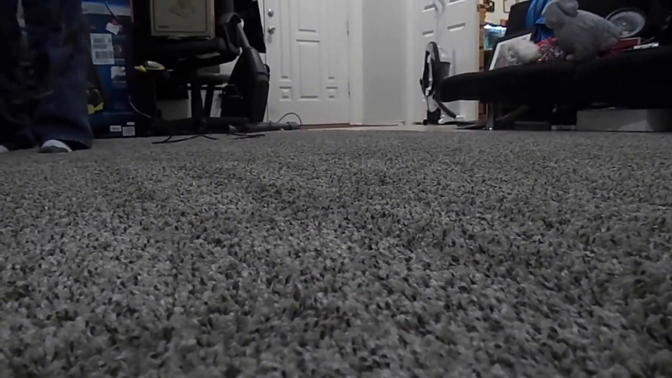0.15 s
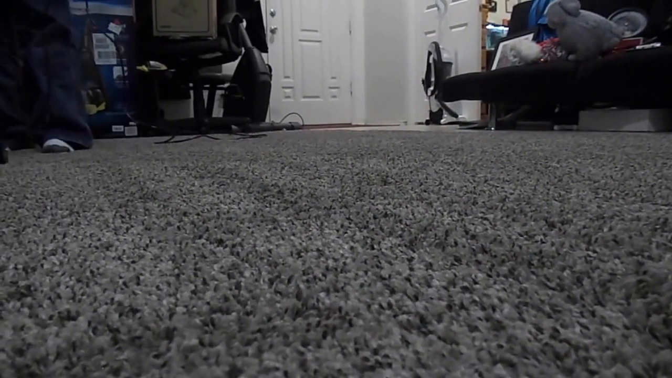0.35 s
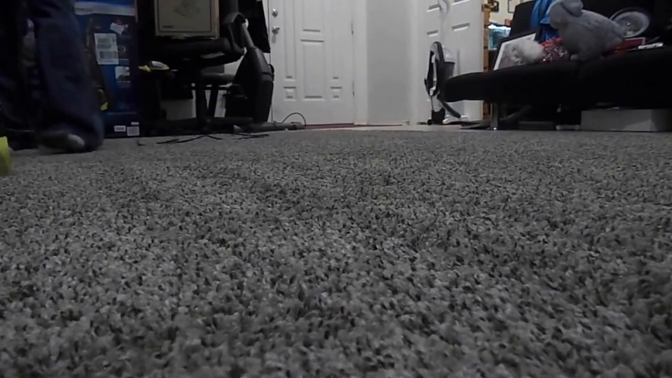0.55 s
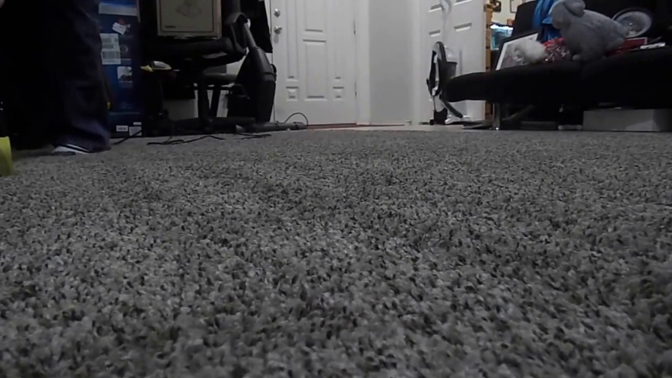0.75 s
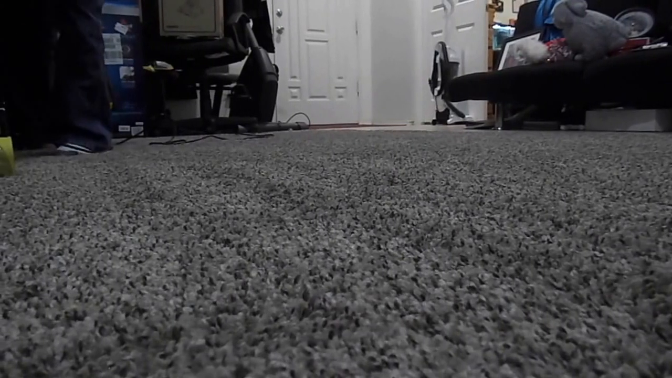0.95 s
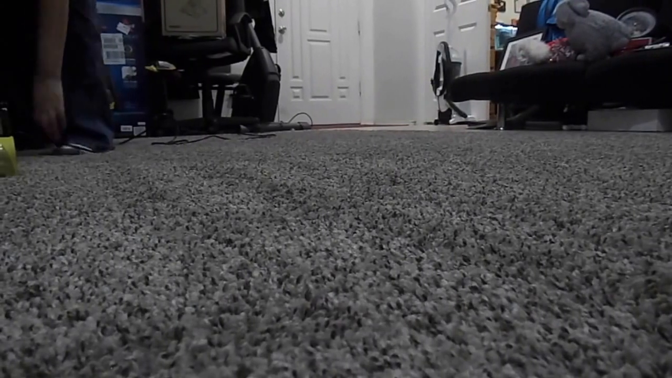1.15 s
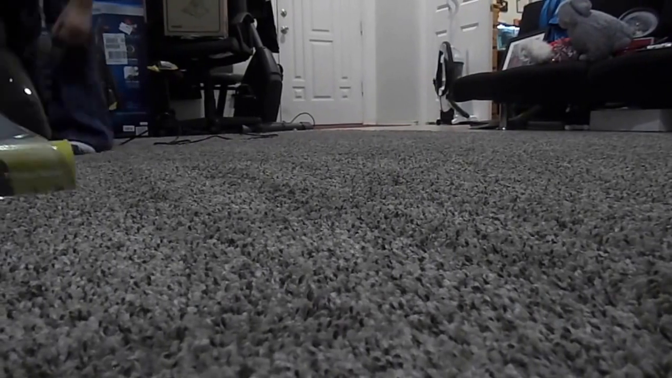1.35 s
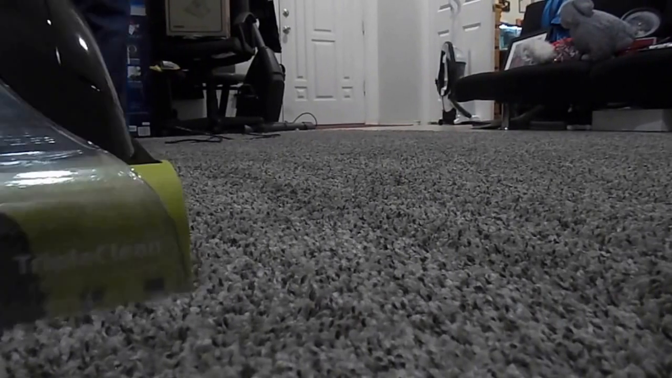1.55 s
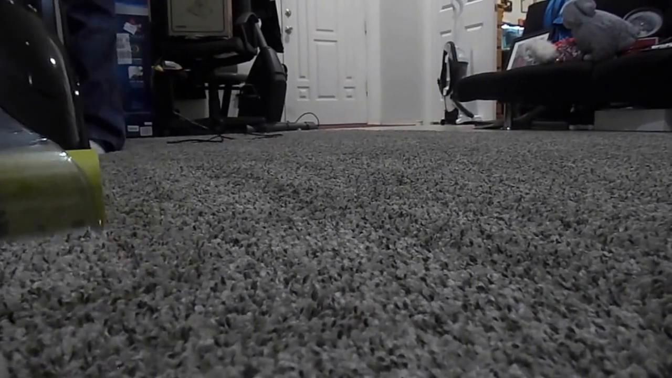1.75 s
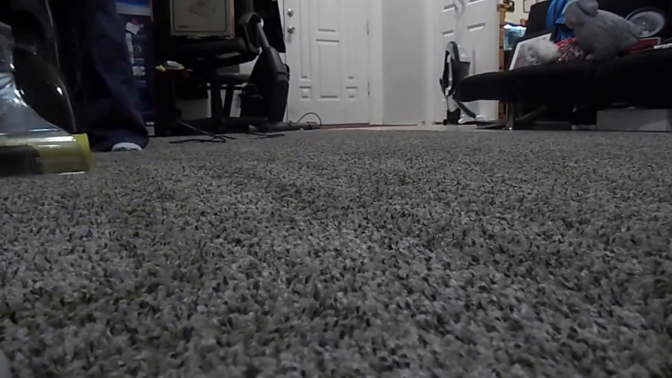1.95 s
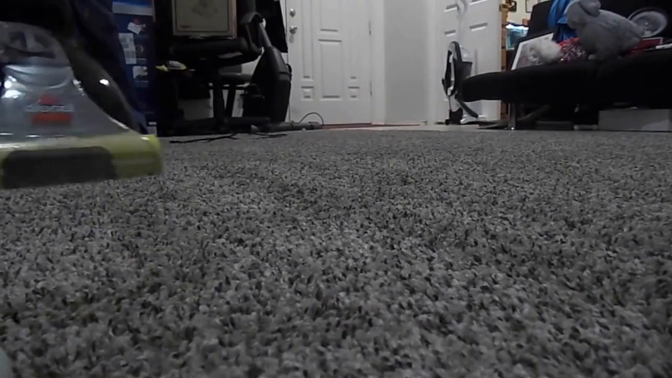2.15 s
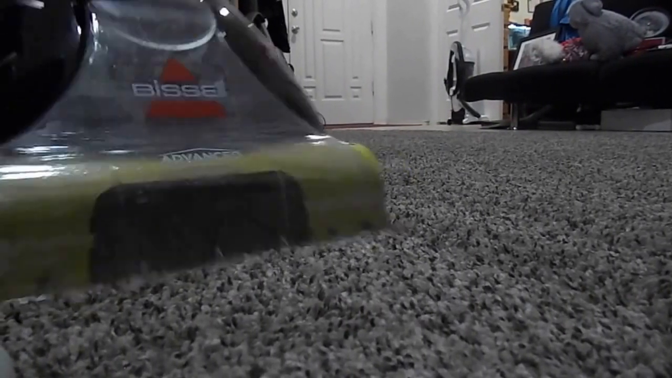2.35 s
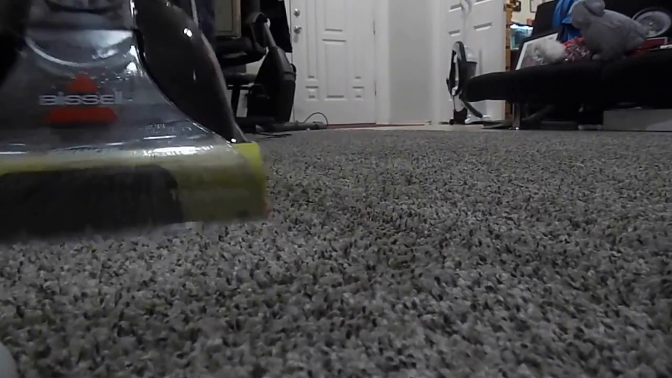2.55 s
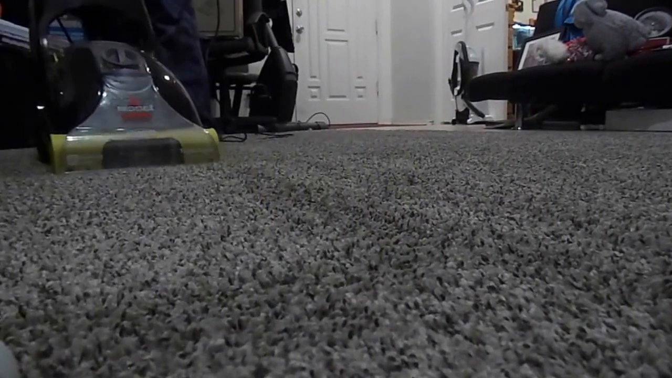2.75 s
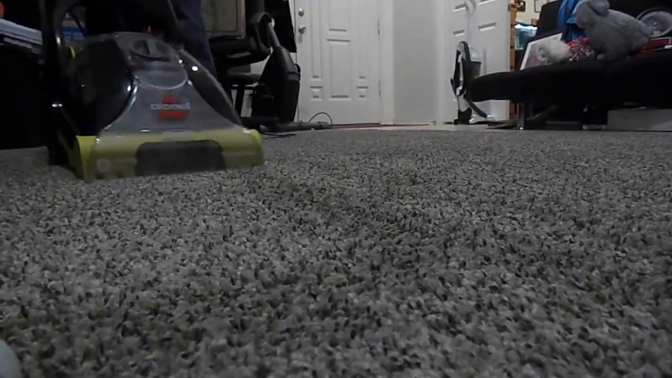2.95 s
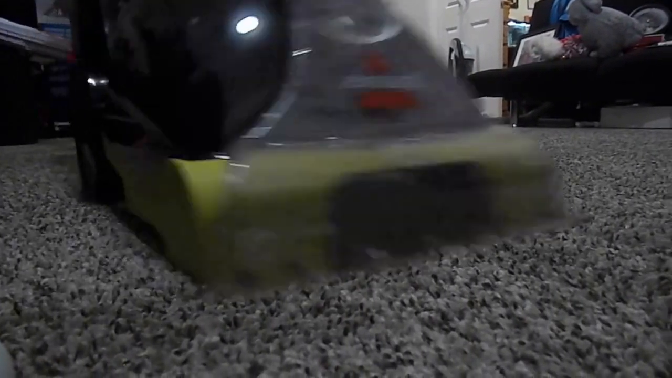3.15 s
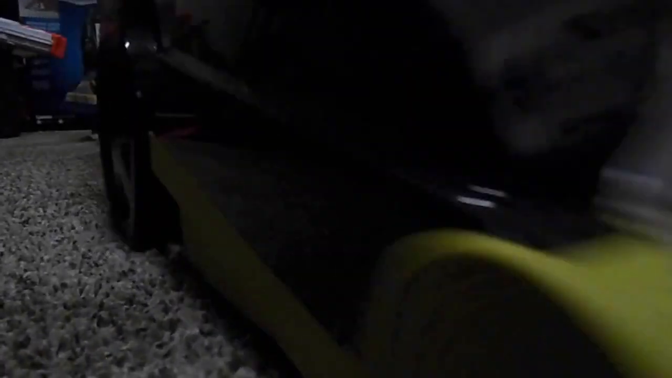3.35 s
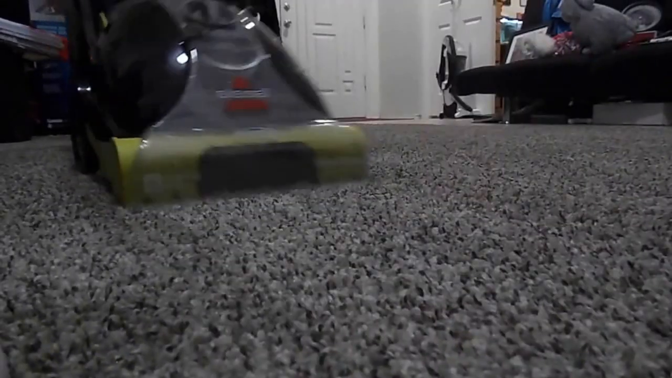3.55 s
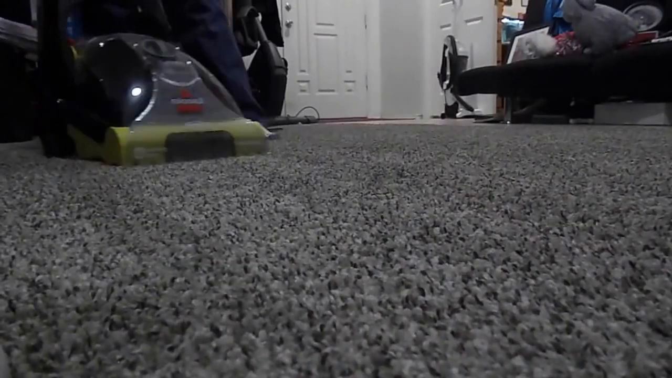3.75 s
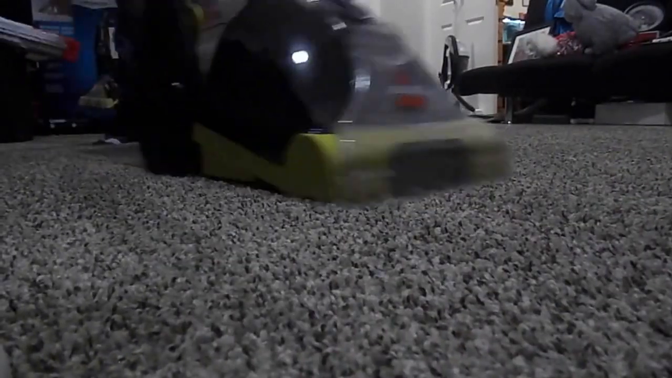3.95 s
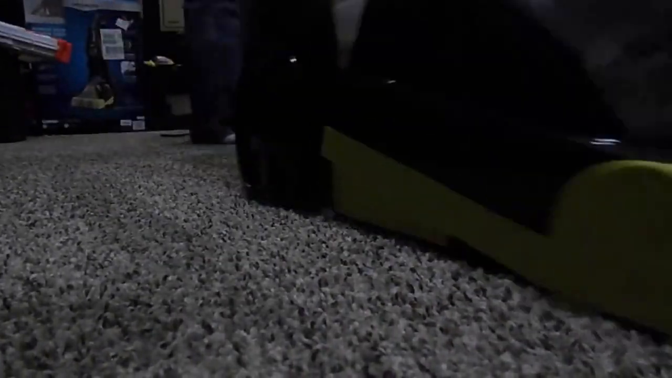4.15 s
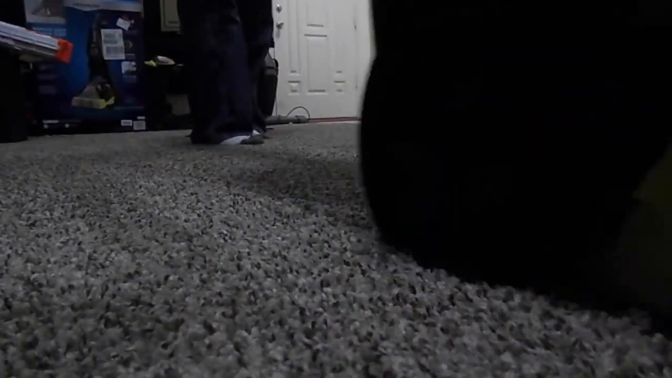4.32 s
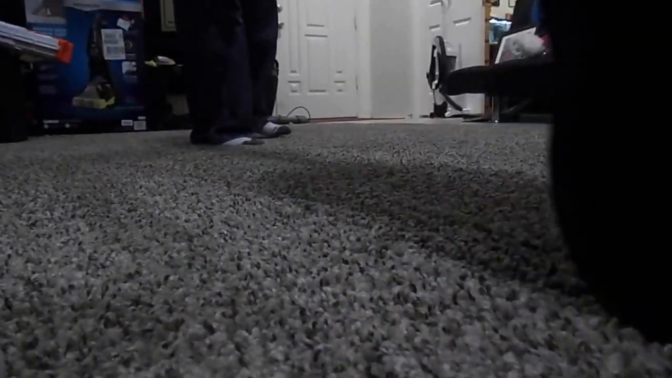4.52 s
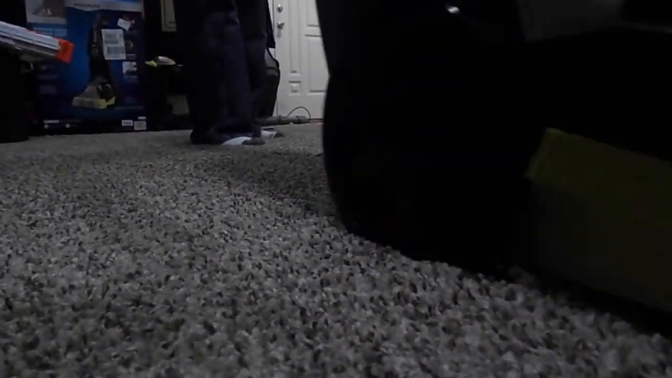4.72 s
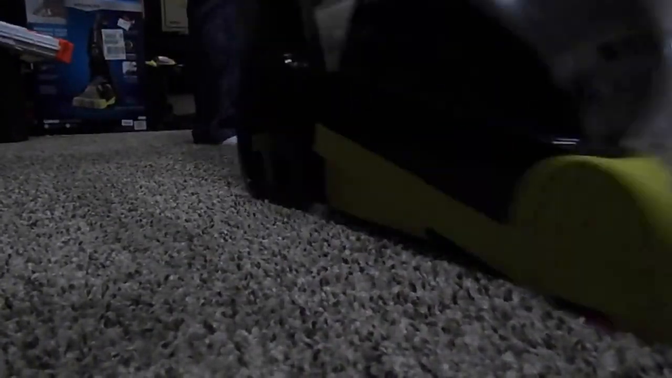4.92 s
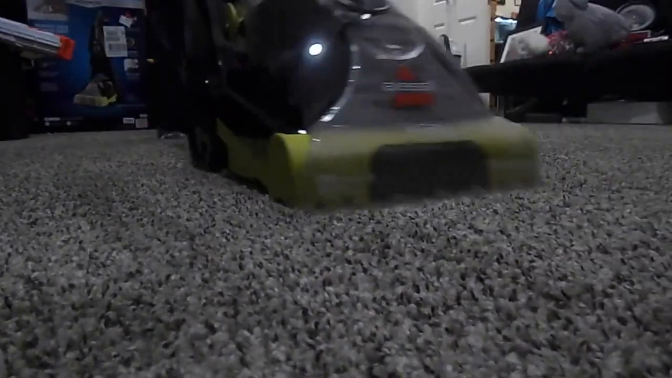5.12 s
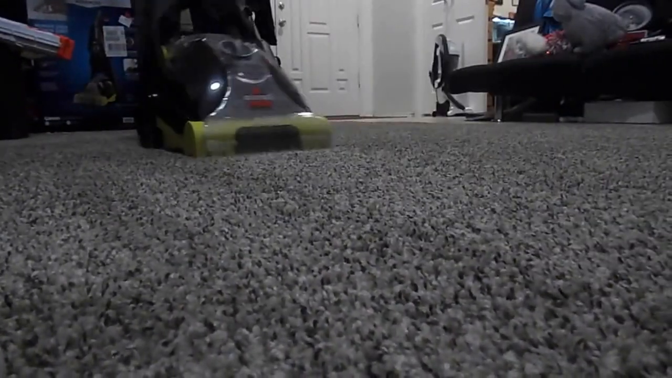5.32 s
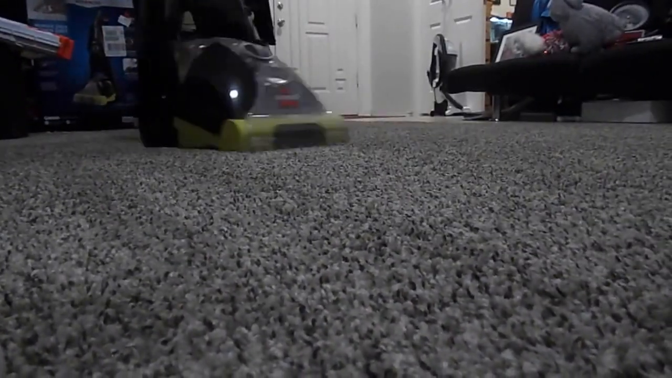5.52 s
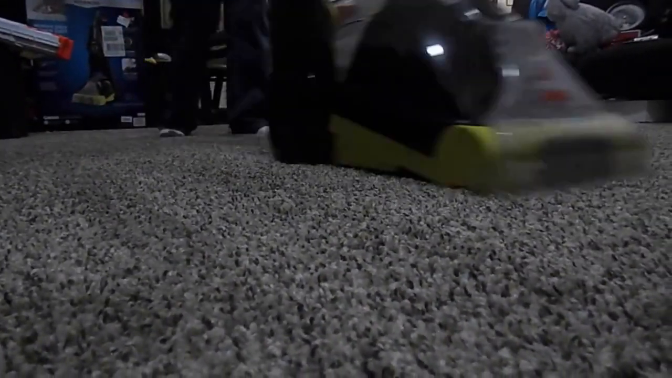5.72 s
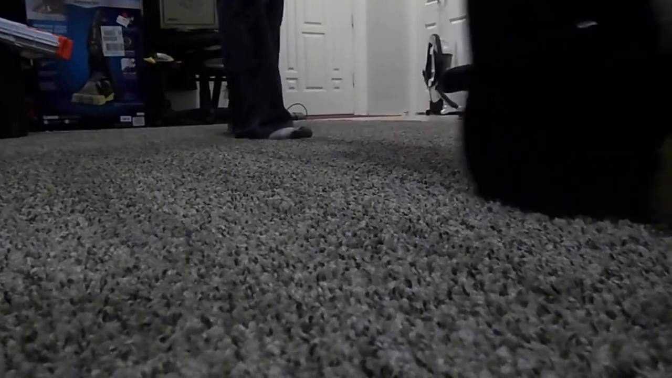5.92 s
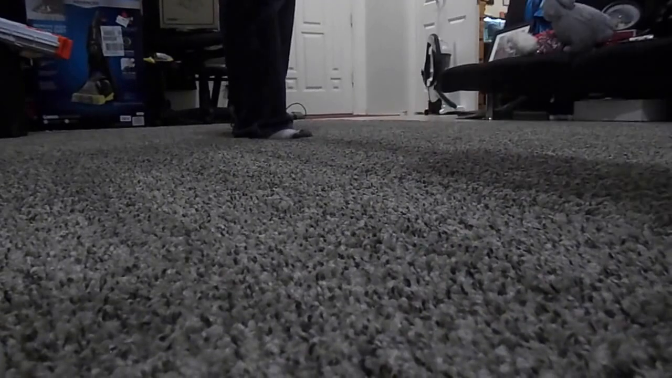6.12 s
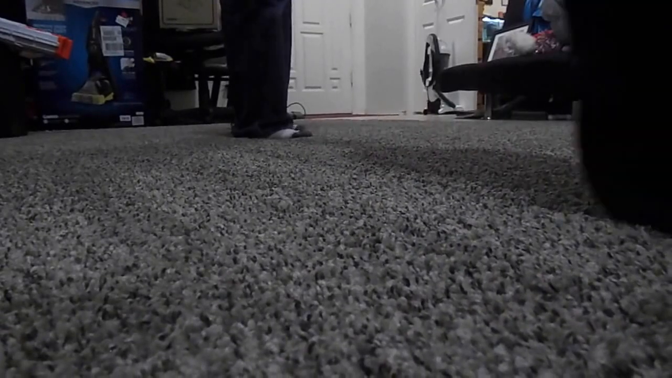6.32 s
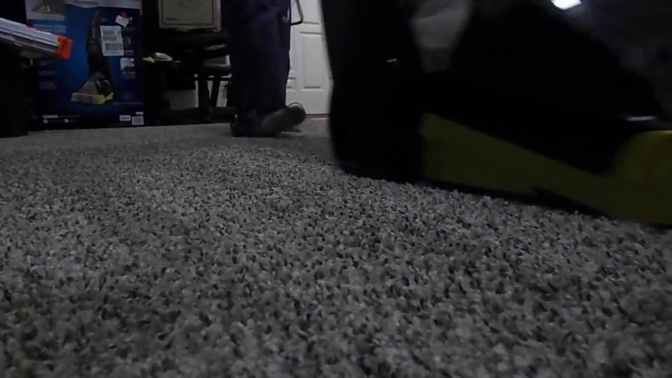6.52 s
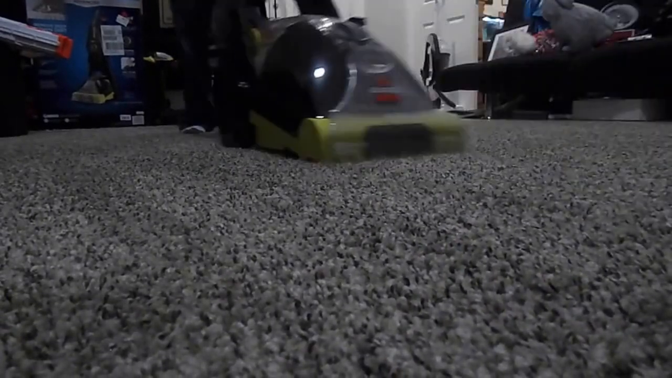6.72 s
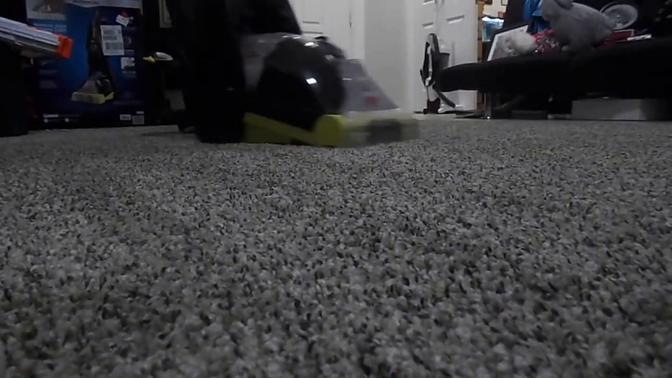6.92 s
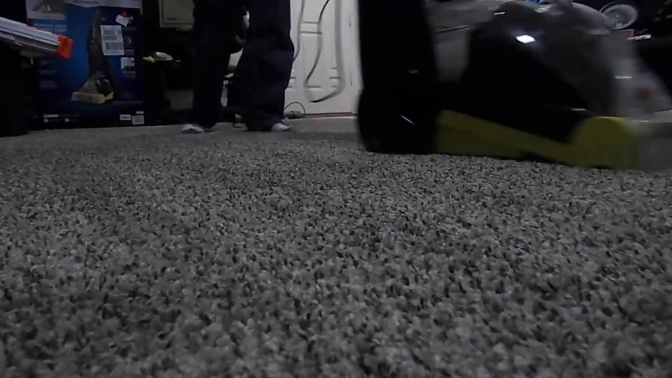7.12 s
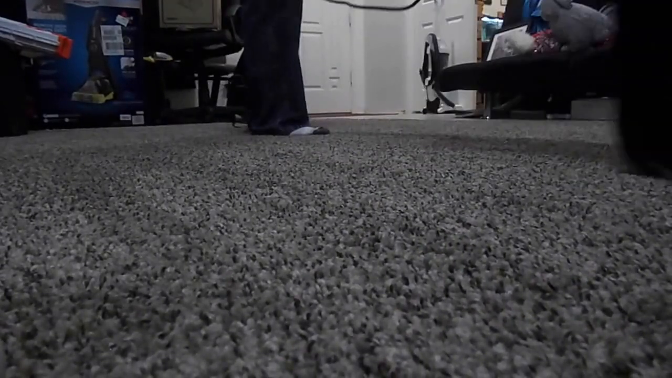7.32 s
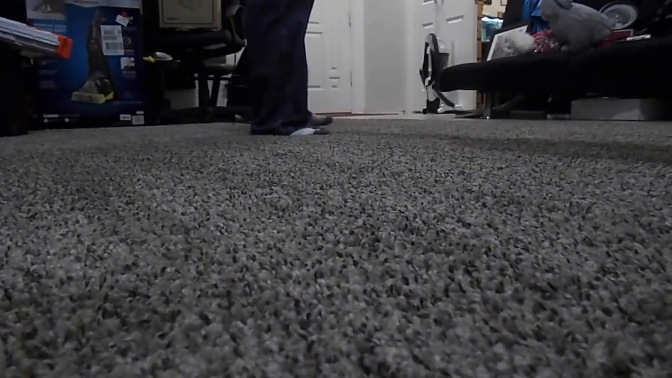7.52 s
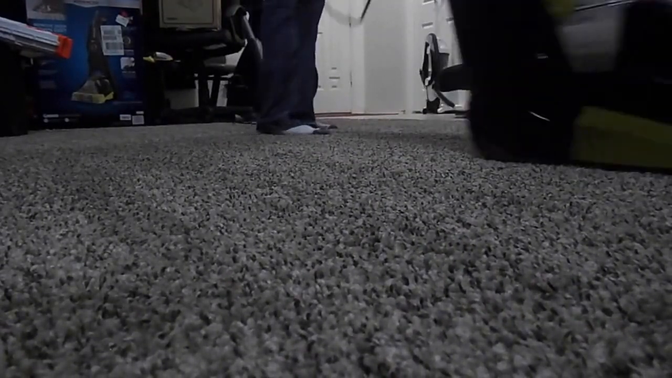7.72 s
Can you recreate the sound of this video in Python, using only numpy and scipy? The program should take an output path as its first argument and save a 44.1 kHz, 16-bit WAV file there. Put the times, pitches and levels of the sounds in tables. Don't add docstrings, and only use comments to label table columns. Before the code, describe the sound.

An electric carpet cleaner runs without pause in a small carpeted room, heard from a microphone on the floor. Airy midrange roar, nozzle hiss and a steady high whine idle for over a second with a fading pump hum, then surge and recede in repeated passes. The loudest rush comes before the middle; later side passes sound broader, with sweeping hollow colour. Thin bass, essentially mono.

```python
import sys
import numpy as np
from scipy import signal
from scipy.fft import rfft, irfft
from scipy.io import wavfile
from scipy.ndimage import uniform_filter1d, map_coordinates

SR = 44100
rng = np.random.default_rng(int(sys.argv[2]) if len(sys.argv) > 2 else 0)


def inscribe(sig):
    pcm = np.round(np.clip(np.atleast_2d(sig).T, -1, 1) * 32767)
    wavfile.write(sys.argv[1], SR, pcm.astype(np.int16))


def rack_gain(trim_db):
    fader = np.asarray(trim_db, float)
    return 10 ** (fader / 20)


N = 342657
TIME = np.arange(N) / SR
FRAME = 2048
TOP_HZ = 15765


def unit(x):
    return x / np.sqrt(np.mean(x ** 2) + 1e-20)


def curves(rows):
    s, *columns = np.transpose(rows)
    return [np.interp(TIME, s, column) for column in columns]


def tents(rows):
    return sum(size * np.clip(1 - abs(TIME - s) / half, 0, 1) for s, half, size in rows)


def wobble(rate):
    knots = rng.standard_normal(int(N * rate / SR) + 4)
    return map_coordinates(knots, [np.arange(N) * rate / SR])


def tone(hz, db, waver_hz, flutter_db):
    phase = 2 * np.pi * np.cumsum(hz + waver_hz * wobble(25)) / SR
    return np.sqrt(2) * rack_gain(db + flutter_db * wobble(20)) * np.sin(phase)


# (time [s], nearness [dB], facing [0 nose-on to 1 side-on])
PATH = [(0, 0.5, 0.065), (.45, -7.5, .02), (1.38, -5.5, 0.051), (1.68, 1, 0.11), (2.1, -8.5, .1),
        (2.53, 1, 0.22), (2.9, -10, 0.11), (3.1, -5, 0.3), (3.38, 7.5, 0.47), (3.758, -8.5, 0.27),
        (4.35, 6, 0.85), (4.85, 6, 0.7), (5.5, -9.5, 0.32), (5.95, 2, 0.88), (6.5, 3.5, .95),
        (6.9, -8.5, 0.32), (7.2, -2.5, 0.83), (7.77, 0.1, 1)]
# (time [s], half length [s], depth [0-1])
TURNS = [
    (4.53, 0.25, 1),
    (6.22, 0.26, 0.97),
    (7.52, 0.32, 0.6),
]


def level(law):
    base_db, per_near_db, side_on_db, turn_db = law
    near_db, facing = curves(PATH)
    return base_db + per_near_db * near_db + side_on_db * facing + turn_db * tents(TURNS)


# (time [s], half length [s], stretch [ratio])
COMB_DIPS = [
    (4.6, .55, -.105),
    (5.5, .3, -.08),
    (6.3, .7, -.115),
    (7.3, .9, -.12),
]


def spectrum(points, hz):
    corner_hz, db = np.transpose(points)
    return rack_gain(np.interp(np.log(hz + 1), np.log(corner_hz), db, left=-120))


def rush(colours, patchy_db, slide=0):
    hz, t, z = signal.stft(rng.standard_normal(N + FRAME), SR, nperseg=FRAME)
    stretch = 1.1 + np.interp(t * SR, np.arange(N), tents(COMB_DIPS))
    nose = spectrum(colours[0], hz[:, None])
    flank = spectrum(colours[1], hz[:, None] / stretch ** slide)
    path_s, _, facing = np.transpose(PATH)
    turn = np.clip(np.interp(t, path_s, facing), 0, 1)
    heard = hz < TOP_HZ
    nose_power = nose ** 2 / np.mean(nose[heard] ** 2)
    flank_power = flank ** 2 / np.mean(flank[heard] ** 2, axis=0)
    colour = np.sqrt((1 - turn) * nose_power + turn * flank_power)
    patches = uniform_filter1d(rng.standard_normal(z.shape), size=4, axis=0)
    patches = unit(uniform_filter1d(patches, size=10, axis=1))
    z = z * colour * heard[:, None] * rack_gain(patchy_db * patches)
    return unit(signal.istft(z, nperseg=FRAME)[1][:N])


# (frequency [Hz], density [dB per Hz])
DUCT = [
    [(680, -44), (1150, -16), (1480, -1.5), (1690, -2), (1750, -2.5), (1840, -7), (1900, -5), (2250, -17), (2920, -48), (4950, -120)],
    [(680, -42), (1150, -18), (1290, -18), (1410, -3.5), (1580, -0.5), (1740, 1), (1940, -7), (2250, -9), (2920, -30), (4950, -120)],
]
# (level at nearness 0 [dB], slope [dB per dB nearness], side-on gain [dB], turn gain [dB])
DUCT_LAW = (-30.5, 0.8056, -2.8, -3)
# (time [s], half length [s], level [dB])
DUCT_SPOTS = [
    (.25, .2, 2),
    (1.5, .12, -2),
    (2.3, 0.13, -3),
    (2.75, 0.33, -3.5),
    (3.78, 0.34, -5),
    (5.45, 0.3, -5.5),
    (7.6, 2, -2.5),
]


def duct(judder):
    db = level(DUCT_LAW) + tents(DUCT_SPOTS) + 0.15 * judder
    return rack_gain(db) * rush(DUCT, patchy_db=1.7)


# (frequency [Hz], density [dB per Hz])
EXHAUST = [
    [(1180, -36), (2000, -2.5), (2470, -3), (2830, -1.5), (3360, -4.5), (3660, -4), (5300, -12.5), (6890, -21), (11700, -120)],
    [(1180, -42), (2000, 1), (2410, -2), (2850, 0.5), (3810, 0), (5300, -16.5), (6890, -42), (11700, -120)],
]
# (level at nearness 0 [dB], slope [dB per dB nearness], side-on gain [dB], turn gain [dB])
EXHAUST_LAW = (-33, 1.15, -0.1, -0.7)
# (time [s], half length [s], level [dB])
EXHAUST_SPOTS = [
    (.8, 0.55, 0.5),
    (3.58, 0.14, -2),
    (5.2, 0.24, -0.5),
]


def exhaust(judder):
    db = level(EXHAUST_LAW) + tents(EXHAUST_SPOTS) + 0.3 * judder + 0.3 * wobble(14)
    return rack_gain(db) * rush(EXHAUST, patchy_db=1.55, slide=0.6)


# (time [s], pitch [Hz])
WHINE_HZ = [(0, 1795), (.35, 1797), (1.4, 1792), (2.15, 1796), (2.6, 1790), (3, 1795), (3.35, 1788),
            (4, 1791), (4.45, 1786), (4.65, 1794), (5.25, 1793), (5.8, 1787), (6.15, 1784), (6.35, 1792),
            (7.3, 1784), (7.77, 1793)]
# (level at nearness 0 [dB], slope [dB per dB nearness], side-on gain [dB], turn gain [dB])
WHINE_LAW = (-33, 0.84, -1.7, -10)
# (time [s], half length [s], level [dB])
WHINE_SPOTS = [(.6, 0.46, 1.5), (1.3, 0.19, 3.5), (1.58, 0.23, -5), (2.0, 0.12, 4), (2.32, 0.21, -8.5),
               (2.56, 0.072, 0.5), (3.0, 0.16, -6.5), (3.18, 0.072, 3.5), (3.56, 0.12, 2), (3.83, .13, -8),
               (5.1, 0.37, 5), (5.58, 0.11, -6), (5.9, .2, 3.5), (6.7, 0.38, 5), (7.0, 0.12, -4),
               (7.4, 0.18, -11), (7.68, .1, -14)]


def gear_whine():
    return tone(*curves(WHINE_HZ), level(WHINE_LAW) + tents(WHINE_SPOTS), waver_hz=1.2, flutter_db=1.1)


# (frequency [Hz], density [dB per Hz])
NOZZLE = [
    [(2820, -35), (4800, -11), (5630, -4.5), (6180, -2.5), (6530, -1.5), (6830, -3), (7690, -2.5), (9050, -6.5), (10400, -4.5), (11700, -10), (13800, -7), (15700, -15)],
    [(2820, -16), (4800, -3.5), (5410, -12), (5740, -1), (6210, -0.5), (7240, -0.5), (8280, -12), (9010, -8), (9800, -2.5), (11000, -7), (13500, -3.5), (15100, -11.5), (15700, -2)],
]
# (level at nearness 0 [dB], slope [dB per dB nearness], side-on gain [dB], turn gain [dB])
NOZZLE_LAW = (-37.5, 0.8, -1.04, -0.2)
# (time [s], half length [s], level [dB])
NOZZLE_SPOTS = [
    (6.3, 0.55, -0.5),
    (7.7, .6, -1),
]


def nozzle(judder):
    db = level(NOZZLE_LAW) + tents(NOZZLE_SPOTS) + 0.2 * judder + 0.4 * wobble(8)
    return rack_gain(db) * rush(NOZZLE, patchy_db=1.5, slide=1)


# (frequency [Hz], density [dB per Hz])
HOUSING = [
    [(180, -90), (300, -51), (370, -50), (430, -29), (500, -33), (550, -19), (605, -25.5), (640, -14), (780, -10), (890, -5), (990, -9.5), (1250, -6.5), (1350, -8.5), (1760, -25.5), (2970, -120)],
    [(180, -67), (300, -41), (398, -25), (443, -27.5), (596, -19), (693, -7.5), (786, -10), (920, -2.5), (1180, 0), (1270, -5), (1350, -0.5), (1760, -24), (2970, -120)],
]
# (level at nearness 0 [dB], slope [dB per dB nearness], side-on gain [dB], turn gain [dB])
HOUSING_LAW = (-40.5, 0.54, -3, .5)
# (time [s], half length [s], level [dB])
HOUSING_SPOTS = [
    (.85, .6, -2.5),
    (1.62, 0.16, -0.5),
    (4.55, 0.88, 3),
    (6.2, 0.33, 3.5),
    (7.15, 0.35, -2),
]


def housing(judder):
    db = level(HOUSING_LAW) + tents(HOUSING_SPOTS) + 0.13 * judder + 0.68 * wobble(6)
    return rack_gain(db) * rush(HOUSING, patchy_db=1.86, slide=0.72)


def air():
    judder = wobble(12)
    return duct(judder) + exhaust(judder) + nozzle(judder) + housing(judder)


# (frequency [Hz], density [dB per Hz])
VANE = [(6300, -63), (6380, -24), (6450, 2), (6480, 0), (6510, -20), (6580, -33), (6680, -120)]
# (level at nearness 0 [dB], slope [dB per dB nearness], side-on gain [dB], turn gain [dB])
VANE_LAW = (-49, .9, -11, -8)
# (time [s], half length [s], level [dB])
VANE_BEAMS = [
    (1.1, 0.51, -11),
    (4.95, .4, 0),
    (6.9, 0.27, 11),
]


def vanes():
    return rack_gain(level(VANE_LAW) + tents(VANE_BEAMS)) * rush((VANE, VANE), patchy_db=1.5)


# (time [s], pitch [Hz], level [dB])
PUMP = [
    (0, 755, -37),
    (.6, 758, -48.5),
    (1.4, 757, -42.5),
    (2.1, 753, -45.5),
    (2.7, 748, -42),
    (2.95, 756, -57),
    (7.77, 761.7, -81),
]


def pump():
    hz, db = curves(PUMP)
    stroke = tone(hz, db - 18, waver_hz=0.3, flutter_db=1.5)
    return stroke + tone(2 * hz, db, waver_hz=4.4, flutter_db=1.5)


# (level at nearness 0 [dB], slope [dB per dB nearness], side-on gain [dB], turn gain [dB])
BLADE_LAW = (-64, -0.1, 2.5, 2)
# (time [s], half length [s], level [dB])
BLADE_BEAMS = [
    (.7, .9, 5),
    (4.4, .3, 18),
    (6.15, .35, 18),
    (7.5, .45, 13),
]


def fan_blades():
    hz = 4283 + 47 * np.exp(-TIME / 2.6)
    db = level(BLADE_LAW) + tents(BLADE_BEAMS)
    blades = tone(hz, db, waver_hz=4, flutter_db=1.5)
    still_db = np.interp(TIME, [1.3, 1.5], [-4, -20])
    for order in (4 / 3, 2):
        blades += tone(order * hz, db + still_db - 2 * order, waver_hz=4, flutter_db=2)
    return blades


# (pitch [Hz], level [dB])
HUM = (479.5, -73.5)


def mains_hum():
    hz, db = HUM
    hum_db = db + 0.34 * curves(PATH)[0] - 0.45 * TIME + 2.7 * wobble(2.3)
    return tone(np.full(N, hz), hum_db, waver_hz=3.5, flutter_db=1.5)


# (frequency [Hz], density [dB per Hz])
WHEELS = [(53, -54), (90, -30), (122, -21), (242, -1.5), (274, -3.5), (340, 4.5), (440, -23), (750, -120)]
# (level at nearness 0 [dB], slope [dB per dB nearness], side-on gain [dB], turn gain [dB])
WHEELS_LAW = (-80.5, 0.43, -3, -3)
# (start [s], end [s], level [dB])
REST = (0.44, 1.4, -7)


def wheels():
    start, end, db = REST
    resting = 1. * (TIME > start) * (TIME < end)
    rest_db = db * uniform_filter1d(resting, size=4000)
    return rack_gain(level(WHEELS_LAW) + rest_db + 3 * wobble(8.1)) * rush((WHEELS, WHEELS), patchy_db=1.5)


def scene():
    mix = air() + gear_whine() + vanes() + pump() + fan_blades() + mains_hum() + wheels()
    heard = np.fft.rfftfreq(N + 1, 1 / SR) < TOP_HZ
    mono = irfft(rfft(mix, N + 1) * heard, N + 1)[:N]
    return np.tile(mono, (2, 1))


def low_pass(x):
    return signal.sosfilt(signal.butter(12, 16950, fs=SR, output="sos"), x)


# (time [s], low edge [Hz], high edge [Hz])
FLICKERS = [(.4995, 11700, 13900), (1.289, 6300, 7700), (1.289, 10300, 12500), (1.289, 13700, 16000),
            (1.312, 10300, 12500), (1.684, 6800, 8400), (1.684, 14500, 16000), (1.777, 11700, 13200),
            (2.473, 6800, 8400), (2.473, 9600, 11100), (2.682, 7500, 9100), (3.03, 5100, 7000),
            (3.03, 8200, 9700), (3.03, 13700, 15300), (3.449, 7500, 10400), (3.449, 12300, 16000),
            (3.541, 5100, 6400), (3.611, 6800, 9100), (3.634, 4200, 6400), (3.634, 8200, 9700),
            (4.075, 8200, 9700), (6.722, 8900, 10400), (6.722, 13000, 14600), (7.419, 7500, 9100),
            (7.489, 6300, 8400), (7.698, 4600, 5800), (7.698, 11000, 13200)]


def record(dry):
    side = np.zeros(N)
    hz = np.fft.rfftfreq(FRAME, 1 / SR)
    rise = np.cumsum(np.kaiser(FRAME // 2, 4 * np.pi))
    window = np.sqrt(np.r_[rise, rise[::-1]] / rise[-1])
    for s, low, high in FLICKERS:
        middle = round(s * SR)
        frame = slice(middle - FRAME // 2, middle + FRAME // 2)
        band = (hz > low) & (hz < high)
        size = np.sqrt(np.mean(np.abs(rfft(dry[0, frame])[band]) ** 2) / FRAME)
        fresh = irfft(rfft(rng.standard_normal(FRAME)) * band)
        side[frame] += rack_gain(-4) * size * window * fresh
    return low_pass(dry + [side, -side])


dry = scene()
out = record(dry)
inscribe(out)
```